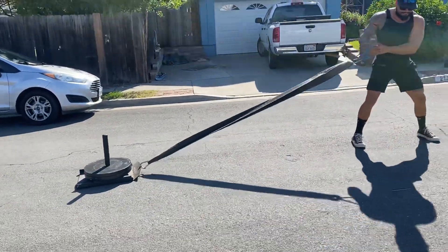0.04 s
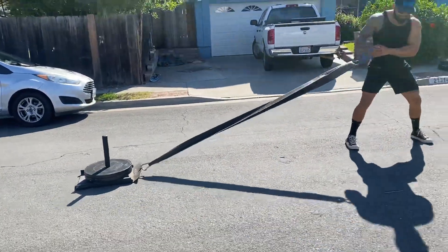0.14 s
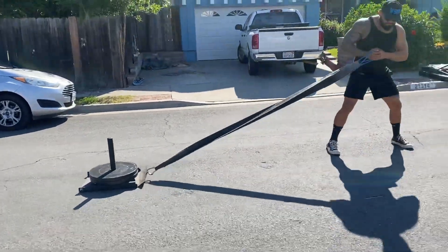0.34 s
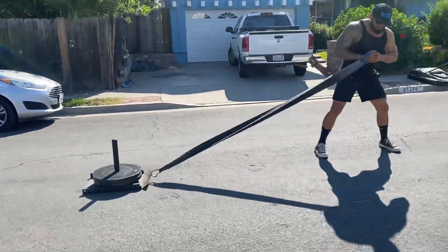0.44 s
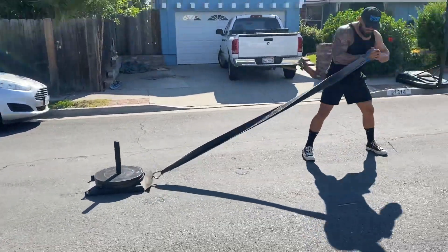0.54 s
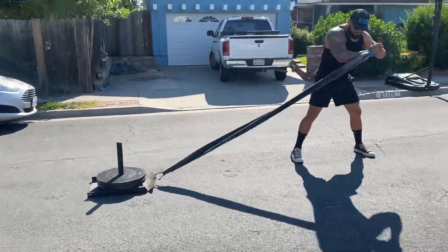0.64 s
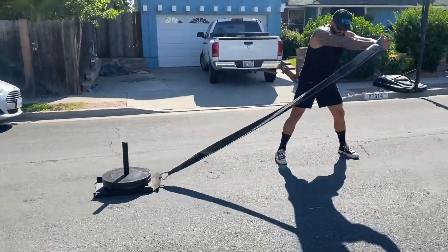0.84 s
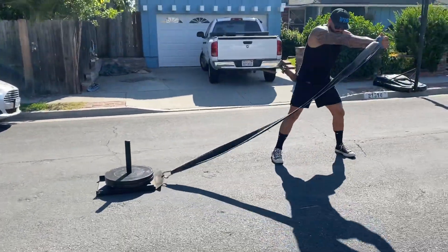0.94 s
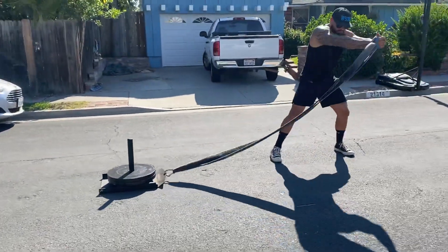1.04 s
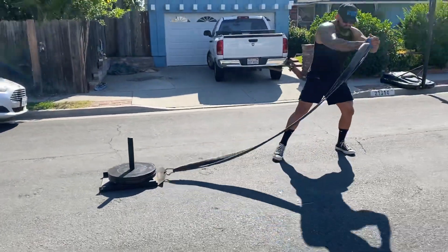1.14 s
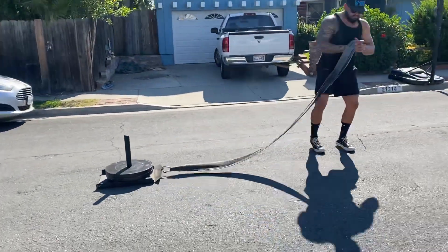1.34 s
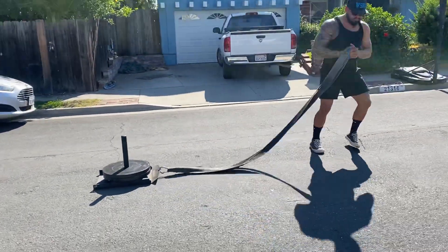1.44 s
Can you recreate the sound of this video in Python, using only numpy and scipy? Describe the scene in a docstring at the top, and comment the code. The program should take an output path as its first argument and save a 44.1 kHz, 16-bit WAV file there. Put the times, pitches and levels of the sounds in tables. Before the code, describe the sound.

A loaded steel sled scrapes over gritty asphalt, already moving at the start and swelling to its loudest around 0.4-0.7 s. At about 0.4 s it snags with hard knocks, chattering plates and crushed stone; more thuds follow near 0.6 and 0.77 s. The scrape drops away from 0.9 to 1.2 s, leaving small settling knocks, a dull clink at 1.34 s, soft shoe scuffs and faint distant traffic outdoors.

```python
"""Grit crunches under the runners of a loaded steel sled pulled once across asphalt: tiny random impacts,
coloured as stone and ringing the frame's modes, over a filtered noise rumble and gliding sine thuds.
Short tones groan, coarse grit surges, snags chatter, crushed stones scratch and steel clanks in decaying sines.
The scraping dies away to soft shoe scuffs and a noise clink from the slack strap's hook.
Behind it lie faint traffic, made of coloured noise, and the wavering sine of a distant engine."""
import sys
import numpy as np
from scipy import signal
from scipy.fft import rfft, irfft
from scipy.io import wavfile
from scipy.ndimage import uniform_filter1d

SR = 44100
rng = np.random.default_rng(int(sys.argv[2]) if len(sys.argv) > 2 else 0)


def to_wav(s):
    """Save 16-bit WAV."""
    ch = np.atleast_2d(s).T  # columns
    pcm = np.round(np.clip(ch, -1, 1) * 32767)  # PCM
    wavfile.write(sys.argv[1], SR, pcm.astype(np.int16))


N = 66150  # samples, 1.5 s

# Drive of the scraping as the pull builds and dies: (time [s], level [dB])
SLIDE_LEVEL = [(0, -7.5), (.08, -2.5), (.23, 1), (.38, 3), (.5, 4.5), (.6, 2), (.66, 4), (.76, 0.5),
               (.855, 1.6), (.9, -3), (1.02, -10.5), (1.11, -24), (1.22, -33), (1.28, -42)]
# Colour of the grit under the runners: (frequency [Hz], relative level per Hz [dB])
GRIT_COLOUR = [(60, -13), (150, -4), (330, -9), (440, -8.5), (560, -1.5), (1000, -6), (1550, -10.5),
               (2100, -7.5), (3200, -9.5), (4100, -14), (6800, -21.5), (7600, -24.5), (8700, -16.5),
               (9500, -24), (14500, -29)]
GRIT_DB, GRIT_PER_S, GRIT_SPREAD_DB = -38, 5000, 0
JUDDER_DB, JUDDER_HZ = 1.4, 69.32  # random flutter of the scraping: depth and rate
# The level drive is raised to this exponent below the split; the hiss above follows it directly
HISS_FROM_HZ, GRIND_EXPONENT = 1840, 0.9
# Ringing modes of frame and plates: (frequency [Hz], relative level [dB], time to fall 60 dB [s])
FRAME_MODES = [(156.7, 4, 1), (240.3, 0.5, 0.26), (273, 2, 0.13), (348, 3.5, 0.15), (365.5, 10, 0.153),
               (599.5, 6, 0.099), (814, -1.5, 0.16), (858, 1.5, 0.039), (945, 2, 0.26), (1180, 1, 0.057),
               (2780, -22, 0.22)]
FRAME_DB, FRAME_WANDER, FRAME_WANDER_HZ = -46, .018, 22  # wander is a fraction of the mode's pitch
# Low rumble of the runners: (time [s], level [dB])
RUMBLE_LEVEL = [(0, -50), (.1, -46.5), (.23, -38.5), (.28, -43), (.37, -67), (.55, -64), (.6, -41.5),
                (.68, -45), (.79, -31), (.825, -56), (.93, -43.5), (1.1, -49.5), (1.2, -61)]
# Colour of the rumble: (frequency [Hz], relative level per Hz [dB])
RUMBLE_COLOUR = [(25, -52), (45, 2.5), (75, 2), (115, 2.5), (180, -7), (400, -52)]

# Distant traffic: (frequency [Hz], relative level per Hz [dB])
TRAFFIC_COLOUR = [(25, 5.5), (70, 0), (190, 2.5), (400, -4), (1000, -4.5), (1600, -10), (2300, -21),
                  (4000, -29.5), (6500, -30), (10000, -28.5), (15000, -44)]
TOWN_DB, TOWN_SWELL_DB, HUM_HZ, HUM_DB = -47.5, 1, 90.2, -54

# Stick-slip groans of a sled resonance: (start [s], length [s], frequency [Hz], peak level [dB])
GROANS = [(.01, 0.036, 558, -38.5), (0.323, 0.055, 599, -34.5), (.44, 0.053, 153.2, -25.5),
          (0.587, 0.1, 356.5, -35), (0.774, 0.049, 369.5, -30)]
GROAN_WAVER, GROAN_WAVER_HZ = 0.018, 78.5  # fraction of the pitch, and rate

# The load drops back on its runners: (time [s], middle of the pitch sag [Hz], level [dB], decay [s])
THUDS = [(0.077, 177, -34, 0.018), (0.298, 99.7, -26, 0.019), (.405, 359, -14, 0.0039),
         (0.4319, 279, -11, 0.0028), (0.4599, 232, -15.5, 0.0053), (0.589, 305, -17.5, 0.0015),
         (0.617, 233, -19, 0.0024), (.63, 150, -27.5, 0.011), (0.767, 144, -20.5, 0.0064),
         (0.792, 77, -38, 0.0021), (1.056, 188, -25, 0.0031), (1.065, 162, -33.5, 0.0049),
         (1.153, 117, -31, 0.0028)]
THUD_RISE_S, THUD_SAG = 0.0013, 0.263  # sag is a fraction of the pitch, each way
THUD_RING_DB = -7  # ringing frame against the thuds

# A runner grinds over coarse grit: (start [s], length [s], level [dB])
GRINDS = [(0.189, 0.06, -38), (0.295, 0.037, -37), (1.038, 0.021, -44), (1.211, 0.023, -45.5)]
# Colour of the coarse grit: (frequency [Hz], relative level per Hz [dB])
COARSE_COLOUR = [(300, 1.5), (850, -0.5), (1250, -0.5), (5000, -30.5)]
COARSE_PER_S = 1200

# The runners snag and the plates chatter: (time [s], level [dB], decay [s])
SNAGS = [(0.39, -29.5, 0.0034), (0.398, -23.5, 0.018), (0.43, -30, 0.063), (0.715, -32.5, 0.0059)]
# Colour of the chatter: (frequency [Hz], relative level per Hz [dB])
CHATTER_COLOUR = [(70, -27.5), (200, -2.5), (340, 6.5), (450, -18), (600, 0), (950, -2.5), (1500, -2),
                  (2000, -6.5), (3300, -14.5), (4200, -40), (7000, -21), (15000, -37)]
SNAG_RISE_S, CHATTER_PER_S, CHATTER_RING_DB = 0.00866, 2600, 1
CHATTER_SPREAD_DB = 2  # shared with the coarse grit

# A stone is crushed under a runner: (time [s], level [dB], decay [s])
SCRATCHES = [(0.397, -21.5, 0.0052), (0.643, -42, 0.018), (0.714, -32, 0.0086)]
# Colour of the crushed stone: (frequency [Hz], relative level per Hz [dB])
STONE_COLOUR = [(300, 14), (1000, -1), (1600, -13), (2300, 8), (3300, 15), (4300, -3.5), (7000, -19.5),
                (15000, -20)]
STONE_RISE_S, STONE_PER_S, STONE_SPREAD_DB = 0.0067, 7000, 1

# Steel knocks on steel as the sled jerks and settles: (time [s], frequency [Hz], level [dB], decay [s])
CLANKS = [(0.399, 600, -16, 0.019), (0.435, 952, -22.5, 0.01), (1.195, 616, -42.5, 0.011),
          (1.3365, 530, -42.5, 0.0024)]
CLANK_RISE_S = 0.0063

# Soft shoe scuffs as the pull ends: (time [s], level [dB], rise [s], decay [s])
SCUFFS = [(1.13, -71, 0.039, 0.077), (1.37, -54, 0.032, 0.67)]
# Colour of the shoe: (frequency [Hz], relative level per Hz [dB])
SHOE_COLOUR = [(200, 12.5), (850, -5), (1500, 3), (3200, -9), (5500, -14), (8000, -23), (15000, -24)]

# The strap's hook clinks: (time [s], level [dB])
CLINKS = [(1.338, -34)]
CLINK_DECAY_S = 0.0021
# Colour of the hook: (frequency [Hz], relative level per Hz [dB])
HOOK_COLOUR = [(150, 9), (600, 1.5), (1400, -8), (3300, -19), (4300, -12.5), (7000, -33), (10000, -19.5),
               (15000, -30)]

# Phase between left and right: (frequency [Hz], lead of the left [rad])
STEREO_PHASE = [(20, 0.35), (1000, 0.56), (1400, 1.3), (1700, 4.36), (3100, 7.06), (4000, 8), (5000, 14.54),
                (6500, 12.55), (14200, 26.23)]
# Balance of left and right: (frequency [Hz], left minus right [dB])
STEREO_BALANCE = [(150, 0), (700, 2), (1300, 3), (2400, 4), (3300, 7), (4600, 0), (6000, 1.5), (9000, -0.5)]
# Scatter from road and house fronts: (frequency [Hz], level against the direct sound [dB])
STREET_COLOUR = [(80, 0), (400, -23.5), (1000, -4), (2000, -9.5), (5000, -1), (12000, -14)]
STREET_DECAY_S = 0.016
LOW_CUT_HZ, TOP_HZ = 44, 14700  # range that the phone passes


def undb(db):
    """Decibels to gain."""
    return 10 ** (np.asarray(db) / 20)


def unit(x):
    """Scale to rms 1."""
    return x / np.sqrt(np.mean(x ** 2))


def clock():
    """Time of every sample, in seconds."""
    return np.arange(N) / SR


def curve(rows):
    """Gain over time from (time [s], level [dB]) points."""
    return undb(np.interp(clock(), *np.array(rows).T))


def bins():
    """Frequencies of the padded spectrum, in Hz."""
    return np.arange(N + 1) * SR / (2 * N)


def response(rows):
    """Gain over frequency from (frequency [Hz], level [dB]) points, joined on a log axis."""
    hz, db = np.array(rows).T
    return undb(np.interp(np.log(bins() + 1), np.log(hz), db))


def shape(x, gain):
    """Filter by a gain for each frequency."""
    return irfft(rfft(x, 2 * N) * gain)[..., :N]


def colour(x, rows):
    """Causal filter through (frequency [Hz], level [dB]) points that keeps the power of white noise."""
    cepstrum = irfft(np.log(unit(response(rows))))
    # folding the cepstrum forward in time gives minimum phase
    cepstrum[1:N] *= 2
    cepstrum[N + 1:] = 0
    return shape(x, np.exp(rfft(cepstrum)))


def walk(rate):
    """Smooth random wander of rms 1, heading for a new value at the given rate in Hz."""
    hold = max(int(SR / rate), 1)
    steps = rng.standard_normal(N)[np.arange(N) // hold]
    return unit(uniform_filter1d(steps, hold))


def grains(rate, spread_db):
    """Random tiny impacts at a mean rate per second, rms 1; a wider spread makes a few stand out."""
    hit = rng.random(N) < rate / SR
    size = undb(spread_db * np.minimum(rng.exponential(size=N), 4))
    sign = np.sign(rng.standard_normal(N))
    return unit(hit * size * sign)


def burst(start, rise, decay):
    """Straight rise, then exponential decay."""
    age = clock() - start
    return np.clip(age / rise, 0, 1) * np.exp(-np.maximum(age - rise, 0) / decay)


def frame(force):
    """The steel frame and plates ring with their modes, which wander as the contact with the road shifts."""
    out = np.zeros(N)
    for hz, db, t60 in FRAME_MODES:
        pitch = hz * (1 + FRAME_WANDER * walk(FRAME_WANDER_HZ))
        turn = np.exp(2j * np.pi * np.cumsum(pitch) / SR)
        keep = np.exp(-np.log(1000) / (t60 * SR))  # left of the ring after one sample
        # spin the force down to zero pitch, let it decay there, spin it back up
        ring = (turn * signal.lfilter([1], [1, -keep], force * turn.conj())).imag
        out += undb(db) * np.sqrt(2 * (1 - keep ** 2)) * ring
    return out / np.linalg.norm([undb(db) for _, db, _ in FRAME_MODES])


def juddering_grit():
    """Steady grit impacts whose level flutters at random."""
    return grains(GRIT_PER_S, GRIT_SPREAD_DB) * unit(undb(JUDDER_DB * walk(JUDDER_HZ)))


def scrape():
    """Juddering grit, one random stream for the low grind and one for the high hiss, rings the frame; it rumbles."""
    low = 1 / (1 + (bins() / HISS_FROM_HZ) ** 4)  # share of the power that grinds
    drive = curve(SLIDE_LEVEL)
    grind = shape(juddering_grit() * drive ** GRIND_EXPONENT, np.sqrt(low))
    hiss = shape(juddering_grit() * drive, np.sqrt(1 - low))
    force = grind + hiss
    rumble = colour(rng.standard_normal(N), RUMBLE_COLOUR) * curve(RUMBLE_LEVEL)
    return undb(GRIT_DB) * colour(force, GRIT_COLOUR) + undb(FRAME_DB) * frame(force) + rumble


def town(alike_hz=900):
    """Far traffic, alike left and right only in the bass, and a wavering engine hum."""
    mid, side = colour(rng.standard_normal((2, N)), TRAFFIC_COLOUR) * undb(TOWN_SWELL_DB * walk(6.7))
    alike = np.clip(0.88 / (1 + (bins() / alike_hz) ** 2), 0, 1)
    shared = shape(mid, np.sqrt((1 + alike) / 2))
    opposed = np.array([[1], [-1]]) * shape(side, np.sqrt((1 - alike) / 2))
    pitch = HUM_HZ * (1 + 0.016 * walk(11.6))
    hum = np.sin(2 * np.pi * np.cumsum(pitch) / SR) * undb(2 * walk(30.2))
    return undb(TOWN_DB) * (shared + opposed) + undb(HUM_DB) * unit(hum)


def groans():
    """A runner sticks and slips: short wavering tones of one resonance that swell and fade."""
    out = np.zeros(N)
    for start, length, hz, db in GROANS:
        age = clock() - start
        pitch = (age > 0) * hz * (1 + GROAN_WAVER * walk(GROAN_WAVER_HZ))
        swell = np.sin(np.pi * np.clip(age / length, 0, 1))
        out += undb(db) * swell * np.sin(2 * np.pi * np.cumsum(pitch) / SR)
    return out


def thuds():
    """Heavy, quickly damped bounces whose pitch sags as the contact relaxes; the frame rings on."""
    out = np.zeros(N)
    for start, hz, db, decay in THUDS:
        age = np.maximum(clock() - start, 0)
        # the pitch glides from 1 + sag down towards 1 - sag
        turns = hz * ((1 - THUD_SAG) * age + 2 * THUD_SAG * decay * (1 - np.exp(-age / decay)))
        out += undb(db) * burst(start, THUD_RISE_S, decay) * np.sin(2 * np.pi * turns)
    return out + undb(THUD_RING_DB) * np.std(out) * unit(frame(out))


def grinds():
    """Coarse grit catches under a runner in short surges of sparse impacts."""
    effort = np.zeros(N)
    for start, length, db in GRINDS:
        effort += undb(db) * np.sin(np.pi * np.clip((clock() - start) / length, 0, 1))
    return colour(grains(COARSE_PER_S, CHATTER_SPREAD_DB) * effort, COARSE_COLOUR)


def snags():
    """Each snag sets off a dying chatter of steel on steel that also rings the frame."""
    effort = sum(undb(db) * burst(start, SNAG_RISE_S, decay) for start, db, decay in SNAGS)
    force = grains(CHATTER_PER_S, CHATTER_SPREAD_DB) * effort
    return colour(force, CHATTER_COLOUR) + undb(CHATTER_RING_DB) * frame(force)


def scratches():
    """Crushed stone: crunches of dense impacts over the scraping."""
    effort = sum(undb(db) * burst(start, STONE_RISE_S, decay) for start, db, decay in SCRATCHES)
    return colour(grains(STONE_PER_S, STONE_SPREAD_DB) * effort, STONE_COLOUR)


def clanks():
    """Hard steel contacts, each with one short ring."""
    out = np.zeros(N)
    for start, hz, db, decay in CLANKS:
        tone = np.sin(2 * np.pi * hz * (clock() - start))
        out += undb(db) * burst(start, CLANK_RISE_S, decay) * tone
    return out


def scuffs():
    """Rubber soles shift on the road: soft swells of fine friction impacts."""
    effort = sum(undb(db) * burst(start, rise, decay) for start, db, rise, decay in SCUFFS)
    return colour(grains(5500, 2.3) * effort, SHOE_COLOUR)


def hook():
    """A short dull clink of noise as the strap goes slack."""
    effort = sum(undb(db) * burst(start, .0015, CLINK_DECAY_S) for start, db in CLINKS)
    return colour(rng.standard_normal(N) * effort, HOOK_COLOUR)


def place(x):
    """The sled lies to the left: that side leads in phase, mostly louder, followed by scatter from the street."""
    lead = np.interp(bins(), *np.array(STEREO_PHASE).T)
    tilt = np.sqrt(response(STEREO_BALANCE))  # half of the balance goes to each side
    direct = shape(x, np.array([tilt, np.exp(-1j * lead) / tilt]))
    tail = rng.standard_normal((2, N)) * burst(0.0024, 0.0014, STREET_DECAY_S)
    tail /= np.linalg.norm(tail, axis=1, keepdims=True)
    scatter = signal.fftconvolve(direct, tail, axes=1)[:, :N]
    return direct + shape(scatter, response(STREET_COLOUR))


def scene():
    """The sled and its strap to the left, with the puller's shoes central, in the quiet street."""
    sled = scrape() + groans() + thuds() + grinds() + snags() + scratches() + clanks()
    return place(sled + hook()) + town() + scuffs()


def record(dry):
    """The phone cuts the deepest bass and the top of the treble."""
    bass_cut = signal.butter(2, LOW_CUT_HZ, "high", fs=SR, output="sos")
    treble_cut = signal.ellip(10, .2, 80, TOP_HZ, fs=SR, output="sos")
    return signal.sosfilt(treble_cut, signal.sosfilt(bass_cut, dry))


dry = scene()
out = record(dry)
to_wav(out)
```